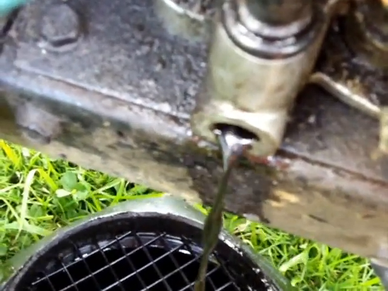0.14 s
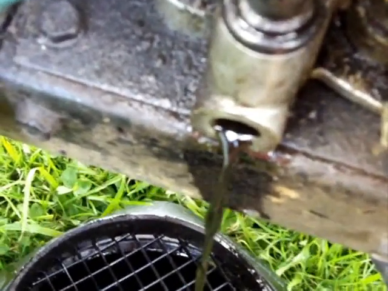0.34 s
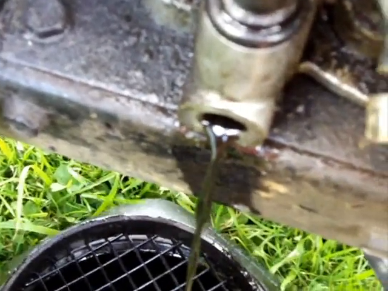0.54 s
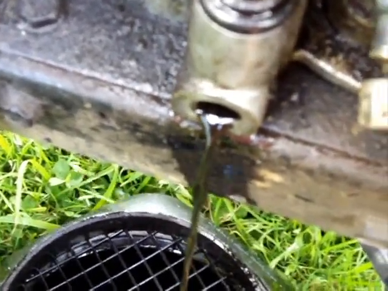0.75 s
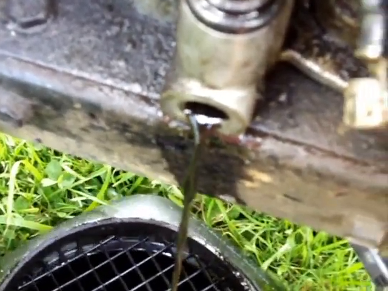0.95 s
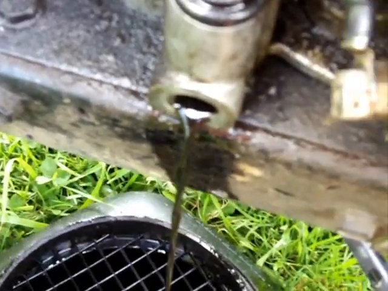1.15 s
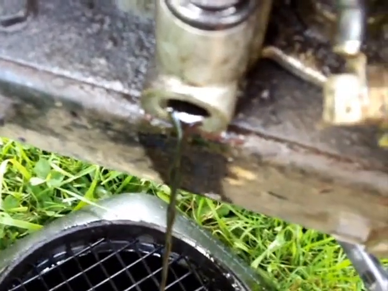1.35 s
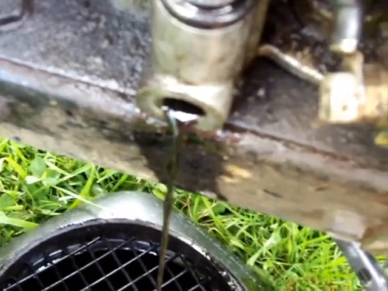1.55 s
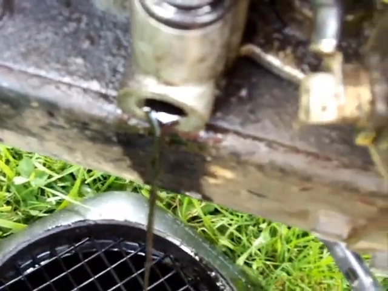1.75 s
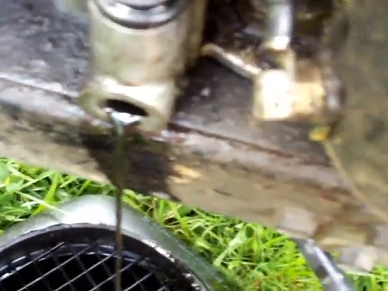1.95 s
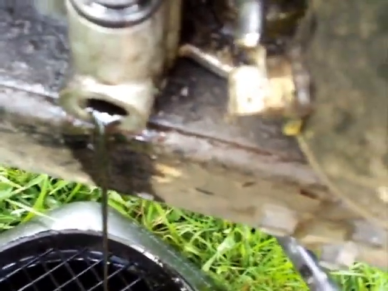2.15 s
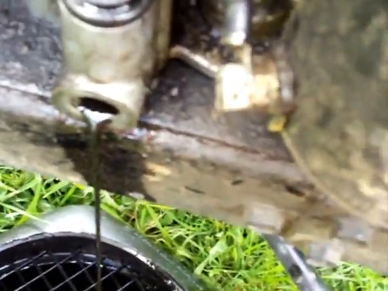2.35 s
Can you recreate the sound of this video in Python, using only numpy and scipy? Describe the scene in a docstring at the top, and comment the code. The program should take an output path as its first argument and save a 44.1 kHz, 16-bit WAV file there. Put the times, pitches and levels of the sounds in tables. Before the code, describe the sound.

Oil dribbles into a plastic pan with quick bubbly chirps, fine spatter ticks and faint hiss

```python
"""Oil draining into a plastic pan

A thin stream of engine oil falls through a mesh screen into a plastic drain pan.
Bubbles burst as short, mostly rising chirps; drops spatter on the mesh as ticks of band noise.
The hollow of the pan rings with both, through resonators and dense echoes.
Shaped noise makes the oil's murmur and a faint hiss; a sine with a dipping pitch makes a thin, high whine."""
import sys
import numpy as np
from scipy import signal
from scipy.fft import rfft, irfft
from scipy.io import wavfile

SR = 44100
rng = np.random.default_rng(int(sys.argv[2]) if len(sys.argv) > 2 else 0)


def dump(signal):
    """Clip the signal to [-1, 1] and save it as 16-bit WAV at the path in sys.argv[1]."""
    limited = np.clip(np.atleast_2d(signal).T, -1, 1)
    pcm = np.round(limited * 32767).astype(np.int16)
    wavfile.write(sys.argv[1], SR, pcm)


N = 110250
CUTOFF_HZ = 16000   # upper limit of chirps and ticks; also sets the final cut


def from_db(db):
    """Decibels to gain."""
    return 10 ** (np.asarray(db) / 20)


def rms_one(x):
    """Scale to unit rms."""
    return x / np.sqrt(np.mean(x ** 2) + 1e-20)


def add(out, start_s, sound):
    """Mix a sound in at a time."""
    start = int(np.clip(start_s * SR, 0, N - 1))
    out[start:start + len(sound)] += sound[:N - start]


def coloured(spectrum):
    """Noise of unit rms, its spectrum interpolated in dB over log frequency."""
    hz, db = np.transpose(spectrum)
    bins_hz = np.maximum(np.arange(N // 2 + 1) * SR / N, 1)
    gain = from_db(np.interp(np.log(bins_hz), np.log(hz), db))
    return rms_one(irfft(rfft(rng.standard_normal(N)) * gain, N))


# hiss spectrum: freq_hz, relative_density_db [dB per Hz]
HISS_SPECTRUM = [(25, 0), (100, -5.5), (350, 9.5), (900, 14), (2000, 6.5), (5000, -2), (7000, -3.5),
                 (8000, 15), (9500, 3.5), (13000, 9), (16000, -1)]
HISS_DB = -62.5


def hiss():
    """Steady shaped noise."""
    return from_db(HISS_DB) * coloured(HISS_SPECTRUM)


WHINE_HZ, WHINE_RMS_DB = 7837.4, -59.5   # mean pitch, level
MAINS_HZ, WHINE_SAG_HZ = 59.95, 40   # rate and mean depth of the pitch dips


def whine():
    """Even electrical whine: a sine whose pitch dips with the mains."""
    dip = np.cos(np.pi * MAINS_HZ * np.arange(N) / SR) ** 10
    pitch_hz = WHINE_HZ - WHINE_SAG_HZ * (dip / dip.mean() - 1)
    phase = 2 * np.pi * np.cumsum(pitch_hz) / SR
    return np.sqrt(2) * from_db(WHINE_RMS_DB) * np.sin(phase)


# how hard the stream churns the oil: time_s, vigour_db
CHURN_CURVE = [(.14, -58), (.22, -51), (.42, -49.5), (.5, -54), (.66, -55), (.8, -49), (1.0, -49),
               (1.23, -47), (1.33, -52.5), (1.6, -55.5), (1.72, -45), (2.17, -45), (2.26, -52),
               (2.42, -59.5)]


def churn_db(time_s):
    """Vigour of the stream, the reference level for murmur, small bubbles and fizz."""
    return np.interp(time_s, *np.transpose(CHURN_CURVE))


# spectrum of the churned oil's murmur and fine spray: freq_hz, relative_density_db [dB per Hz]
MURMUR_SPECTRUM = [(100, -29), (250, -27), (350, 9.5), (660, -7.5), (780, 9), (1400, 4.5), (1850, -30),
                   (3100, -5), (7000, -5), (15000, -33)]
MURMUR_DB = -14.5   # re churn


def murmur():
    """Shaped noise that follows the churn."""
    return from_db(churn_db(np.arange(N) / SR) + MURMUR_DB) * coloured(MURMUR_SPECTRUM)


CHIRP_OCT = .22   # mean rise in pitch during one swell
ROUGH, ROUGH_WIDTH = 0.29, 0.27   # film flutter: depth, bandwidth as a share of the pitch


def chirp(pitch_hz, cycles):
    """A bursting bubble: a tone that flutters as the film tears, swells, rises as the hole opens, and dies."""
    u = np.minimum(np.arange(1300) * pitch_hz / (max(cycles, .5) * SR), 10)   # time in swells
    rise_oct = CHIRP_OCT * rng.uniform(0, 2)
    glide_hz = np.minimum(pitch_hz * 2 ** (rise_oct * (u - 1)), CUTOFF_HZ)
    phase = 2 * np.pi * np.cumsum(glide_hz) / SR
    r = np.exp(-2 * np.pi * ROUGH_WIDTH * pitch_hz / SR)
    noise = rng.standard_normal((2, len(u)))
    flutter = ROUGH * rms_one(signal.lfilter([1], [1, -2 * r, r * r], noise))
    envelope = (u * np.exp(1 - u)) ** 2.96
    tone = envelope * ((1 + flutter[0]) * np.sin(phase) + flutter[1] * np.cos(phase))
    return rms_one(tone) * np.sqrt(np.mean(envelope ** 2) / 2)


SMALL_PER_S, SMALL_THINNING = 720, .4   # rate at full churn; how closely the number follows churn
SMALL_DB, SMALL_SPREAD_DB = -3, 3.5   # re churn; scale of the random excess
SMALL_TILT_DB = 5   # highest re lowest
SMALL_LOW_HZ, SMALL_HIGH_HZ = 779.6, 7240
SMALL_CYCLES = 2.65   # mean swell of the lowest


def small_bubbles():
    """A random crowd of chirps that thickens and swells with the churn."""
    out = np.zeros(N)
    full_db = max(db for _, db in CHURN_CURVE)
    for when, size, strength, length, chance in rng.random((int(SMALL_PER_S * N / SR), 5)):
        start_s = when * N / SR
        vigour_db = churn_db(start_s)
        if chance >= from_db(SMALL_THINNING * (vigour_db - full_db)):
            continue
        pitch_hz = SMALL_LOW_HZ * (SMALL_HIGH_HZ / SMALL_LOW_HZ) ** size
        excess_db = SMALL_SPREAD_DB * min(-np.log(strength), 2.5)
        level_db = vigour_db + SMALL_DB + SMALL_TILT_DB * (size - .5) + excess_db
        cycles = SMALL_CYCLES * (.5 + length) * np.sqrt(pitch_hz / SMALL_LOW_HZ)
        add(out, start_s, from_db(level_db) * chirp(pitch_hz, cycles))
    return out


FIZZ_PER_S, FIZZ_CYCLES = 190, 9
FIZZ_DB, FIZZ_SPREAD_DB = -3, 7   # re churn; scale of the random excess
FIZZ_HZ, FIZZ_RANGE_OCT = 9150, 1.123   # centre, full spread


def fizz():
    """Tiny bubbles in the spray: random high chirps whose level follows the churn."""
    out = np.zeros(N)
    for when, size, strength in rng.random((int(FIZZ_PER_S * N / SR), 3)):
        start_s = when * N / SR
        pitch_hz = FIZZ_HZ * 2 ** (FIZZ_RANGE_OCT * (size - .5))
        excess_db = FIZZ_SPREAD_DB * min(-np.log(strength), 2)
        level_db = churn_db(start_s) + FIZZ_DB + excess_db
        add(out, start_s, from_db(level_db) * chirp(pitch_hz, FIZZ_CYCLES))
    return out


SPLAT_SWELL_S, SPLAT_HALF_WIDTH_OCT = 0.00077, 0.38


def tick(centre_hz):
    """A drop breaking on the mesh: band noise that swells and dies within milliseconds."""
    t = np.arange(SR // 50) / SR
    ratio = 2 ** SPLAT_HALF_WIDTH_OCT
    edges_hz = [centre_hz / ratio, min(centre_hz * ratio, CUTOFF_HZ)]
    envelope = np.sqrt(t / SPLAT_SWELL_S * np.exp(1 - t / SPLAT_SWELL_S))
    band = signal.butter(2, edges_hz, "band", fs=SR)
    burst = signal.lfilter(*band, envelope * rng.standard_normal(len(t)))
    return rms_one(burst) * np.sqrt(np.mean(envelope ** 2))


# drops spattering on the mesh: start_s, centre_hz, level_db [re SPLAT_DB]
SPLAT_EVENTS = [ (.010, 11600, -33), (.177, 8100, -27), (0.231, 6400, -24.5), (0.4228, 9000, -19),
                (0.506, 8700, -22.5), (0.518, 6400, -24.5), (0.542, 8600, -21), (0.569, 9600, -23.5),
                (0.626, 10900, -23), (0.6834, 7800, -22), (0.72, 8450, -26.5), (.752, 5450, -27.5),
                (0.788, 6400, -28), (0.808, 11700, -19.5), (0.836, 6600, -24.5), (.845, 7600, -20.5),
                (.903, 6900, -28), (.933, 5350, -24.5), (0.941, 6240, -22.5), (0.965, 7360, -22.5),
                (0.979, 3530, -29), (1.026, 4350, -27), (1.048, 7600, -26), (1.145, 10200, -26),
                (1.155, 5570, -25), (1.169, 10600, -25.5), (1.26, 3900, -29.5), (1.286, 8200, -27),
                (1.397, 4800, -30), (1.423, 9600, -27), (1.461, 8100, -27), (1.511, 9800, -29),
                (1.521, 6200, -31), (1.548, 11300, -22.5), (1.649, 3930, -35), (1.664, 8400, -28),
                (1.68, 11400, -22), (1.745, 11300, -22), (1.806, 9100, -30), (1.817, 11000, -29),
                (1.887, 10500, -29), (1.9223, 5550, -28), (1.954, 7400, -27.5), (1.999, 6000, -30),
                (2.019, 8300, -22.5), (2.053, 6960, -26.5), (2.111, 6040, -29), (2.127, 12500, -23),
                (2.164, 5800, -29), (2.2271, 4840, -23.5), (2.315, 6060, -28.5)]
SPLAT_DB = -9.5


def spatter():
    """Large drops striking the mesh, one tick each."""
    out = np.zeros(N)
    for start_s, centre_hz, level_db in SPLAT_EVENTS:
        add(out, start_s, from_db(level_db + SPLAT_DB) * tick(centre_hz))
    return out


# large bursting bubbles: peak_s, pitch_hz, level_db [before the pan], swell_cycles
BUBBLE_EVENTS = [ (0.2322, 6940, -15.5, 9.6), (0.295, 5050, -37, 9.3), (0.334, 3526, -37.5, 18.4),
                 (.397, 890, -34.5, 3), (0.401, 3780, -37.5, 10.3), (.425, 3300, -36, 10.6),
                 (.430, 760, -37, 1.3), (0.615, 1375, -46.5, 7.7), (0.638, 5360, -34, 13.5),
                 (.687, 2690, -33, 6.6), (.724, 1440, -35.5, 4), (0.792, 3660, -34, 5.7),
                 (0.805, 3003, -39.5, 25), (0.837, 4000, -34.5, 8.8), (0.845, 4620, -29.5, 8.7),
                 (0.8786, 900, -32.5, 0.59), (0.8943, 3400, -38.5, 5), (.905, 4890, -26.5, 8.3),
                 (0.97, 7200, -28, 7.3), (.9806, 950, -36, 0.83), (.982, 2260, -32.5, 4),
                 (.989, 740, -45, 5.5), (1.007, 3180, -38, 12), (1.014, 8900, -30, 11),
                 (1.096, 1450, -35, 2.2), (1.097, 2930, -27.5, 5.8), (1.104, 3090, -37.5, 10.4),
                 (1.213, 1276, -31.5, 2.44), (1.228, 2990, -35, 17), (1.239, 4680, -32.5, 9.4),
                 (1.2614, 6300, -26.5, 8.5), (1.289, 6370, -31.5, 19), (1.310, 3940, -32.5, 10.6),
                 (1.399, 1474, -39.5, 5.1), (1.461, 1360, -44, 4), (1.541, 5230, -27.5, 6),
                 (1.615, 3650, -33.5, 9.4), (1.624, 5790, -30, 11.4), (1.651, 1170, -34.5, 2.48),
                 (1.666, 4230, -28.5, 8.2), (1.667, 8050, -24.5, 18), (1.682, 3730, -27.5, 15),
                 (1.6973, 4350, -12, 4.05), (1.698, 1430, -37, 3.3), (1.716, 1310, -41, 5),
                 (1.749, 2240, -32.5, 10.8), (1.781, 1046, -40, 4), (1.792, 3430, -29.5, 10.6),
                 (1.793, 1510, -35.5, 5.3), (1.808, 4940, -29, 5.64), (1.818, 4720, -21.5, 7),
                 (1.843, 5970, -29, 15.3), (1.888, 5790, -21, 10), (1.924, 6780, -24.5, 7.3),
                 (1.959, 3510, -34.5, 12), (1.987, 5400, -29, 6.4), (1.992, 1520, -37.5, 4),
                 (2, 5660, -25, 13.4), (2.005, 2295, -37, 11.5), (2.051, 1350, -35.5, 3.4),
                 (2.052, 2840, -31.5, 5), (2.06, 5500, -26, 6.1), (2.065, 2100, -39, 6.5),
                 (2.111, 5450, -24.5, 11.6), (2.167, 3460, -35, 6.7), (2.178, 3320, -36, 8.6),
                 (2.2027, 1360, -33.5, 2.15), (2.23, 1570, -31.5, 3.9), (2.379, 977, -42, 2.9),
                 (2.46, 2440, -46.5, 5), (2.472, 1770, -43.5, 6)]


def large_bubbles():
    """Single bubbles bursting, each chirp started one swell before its peak."""
    out = np.zeros(N)
    for peak_s, pitch_hz, level_db, cycles in BUBBLE_EVENTS:
        add(out, peak_s - cycles / pitch_hz, from_db(level_db) * chirp(pitch_hz, cycles))
    return out


def reflections(x, t60_s, delay_s):
    """Dense echoes that die away evenly."""
    t = np.arange(SR // 4) / SR
    tail = rng.standard_normal(len(t)) * from_db(-60 * t / t60_s) * (t > delay_s)
    return signal.fftconvolve(x, tail / np.sqrt(np.sum(tail ** 2)))[:N]


# air modes of the pan: freq_hz, gain_db
AIR_MODES = [(520, -5.5), (786, -0.5), (1100, -2.5), (1370, 1.5), (2320, 0.5), (3080, 6.5), (3800, -1),
             (4800, -8), (5750, -5.5)]
MODE_WIDTH_HZ, PAN_LOW_HZ = 103, 302   # mode bandwidth; little is radiated below PAN_LOW_HZ
DIRECT_DB, WALLS_DB = -4.5, -6.5
WALLS_T60_S, WALLS_DELAY_S = 0.04, 0.0014


def pan(x):
    """The hollow of the pan: direct sound, wall reflections and ringing air modes."""
    out = from_db(DIRECT_DB) * x + from_db(WALLS_DB) * reflections(x, WALLS_T60_S, WALLS_DELAY_S)
    r = np.exp(-np.pi * MODE_WIDTH_HZ / SR)
    zeros = np.array([1, 0, -1]) * (1 - r * r) / 2   # unit peak gain
    for freq_hz, gain_db in AIR_MODES:
        poles = [1, -2 * r * np.cos(2 * np.pi * freq_hz / SR), r * r]
        out = out + from_db(gain_db) * signal.lfilter(zeros, poles, x + 1e-18)
    return signal.sosfilt(signal.butter(2, PAN_LOW_HZ, "high", fs=SR, output="sos"), out)


def scene():
    """Hiss, whine and murmur, with bubbles and drops ringing in the pan."""
    in_pan = small_bubbles() + fizz() + spatter() + large_bubbles()
    return (hiss() + whine() + murmur() + pan(in_pan))[None]


def record(dry):
    """The microphone dulls the top; a steep cut ends it."""
    dull = signal.sosfilt(signal.butter(2, min(12500, CUTOFF_HZ), fs=SR, output="sos"), dry)
    steep = signal.ellip(10, .2, 80, CUTOFF_HZ - 400, fs=SR, output="sos")
    return signal.sosfilt(steep, dull)


dry = scene()
out = record(dry)
dump(out)
```